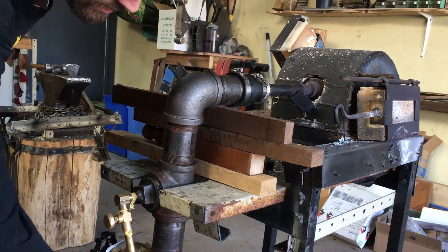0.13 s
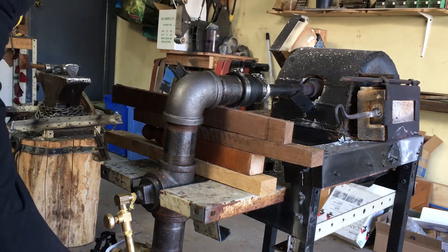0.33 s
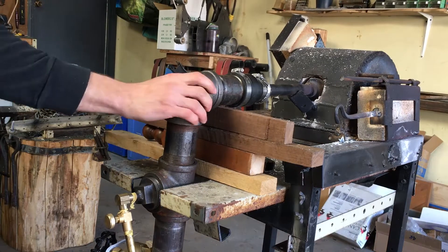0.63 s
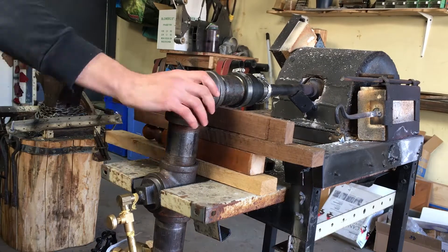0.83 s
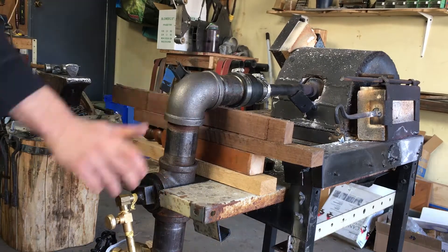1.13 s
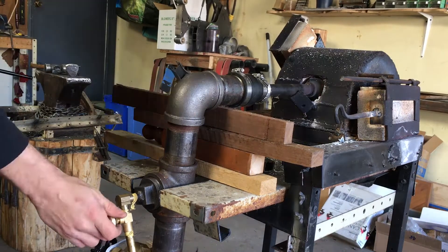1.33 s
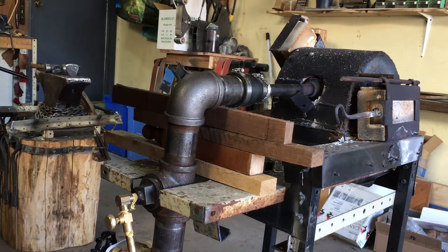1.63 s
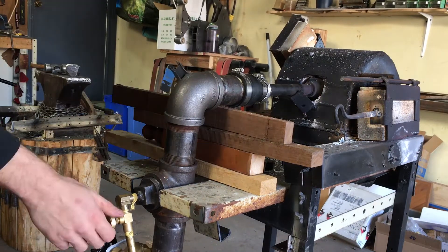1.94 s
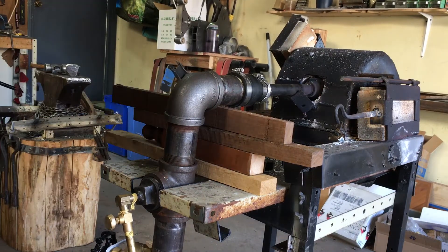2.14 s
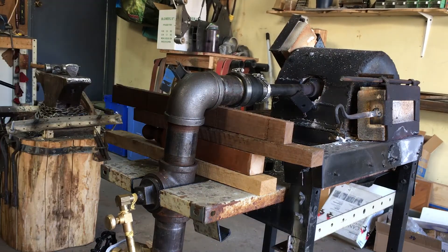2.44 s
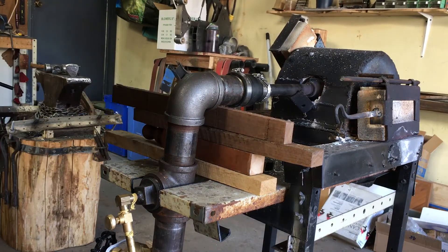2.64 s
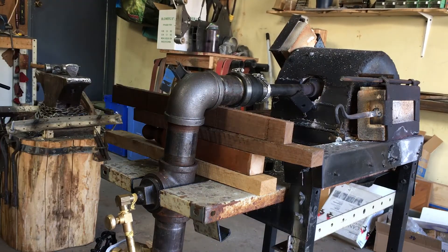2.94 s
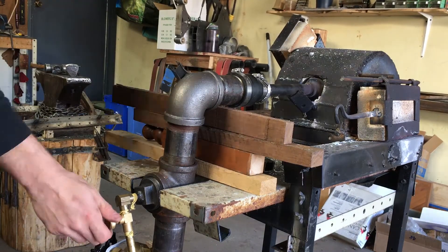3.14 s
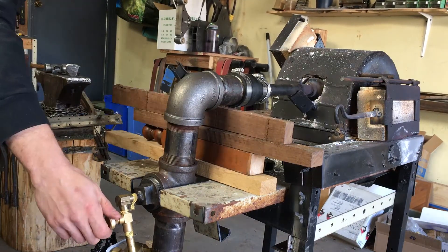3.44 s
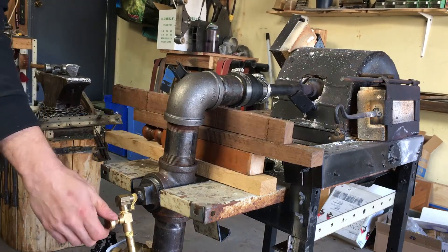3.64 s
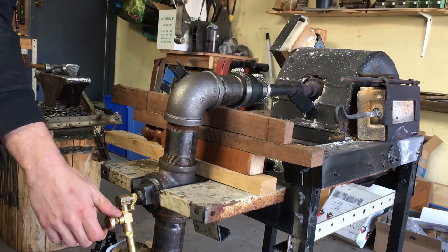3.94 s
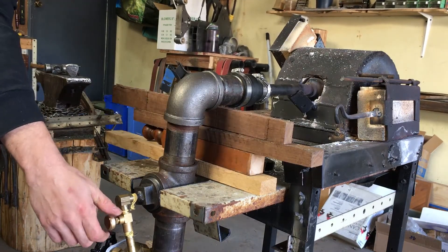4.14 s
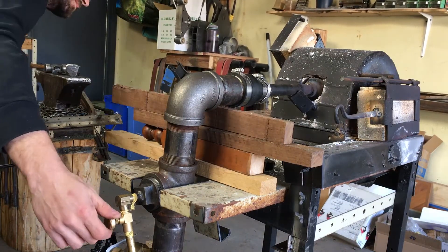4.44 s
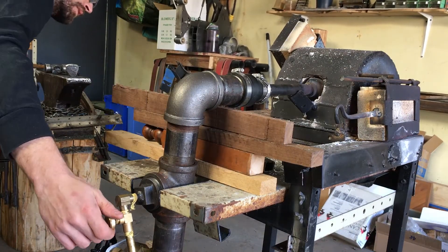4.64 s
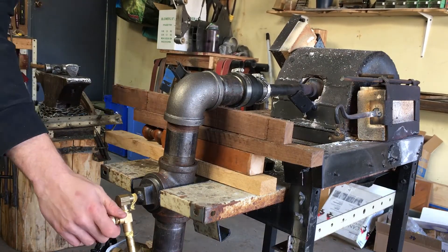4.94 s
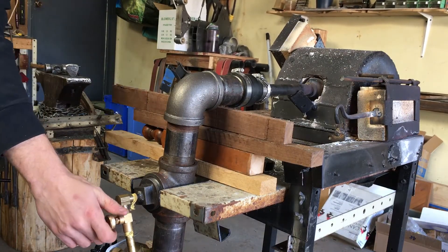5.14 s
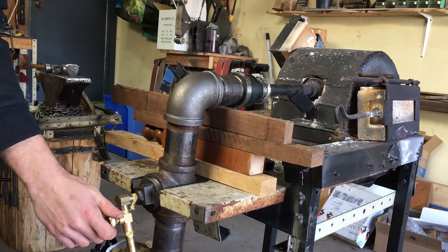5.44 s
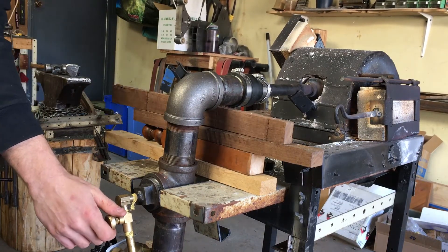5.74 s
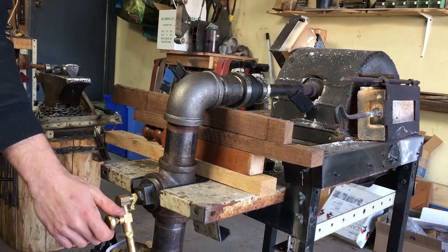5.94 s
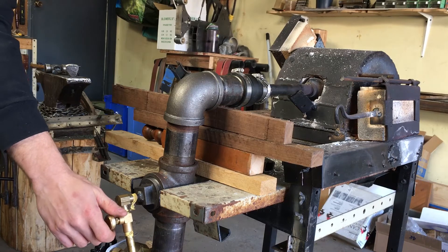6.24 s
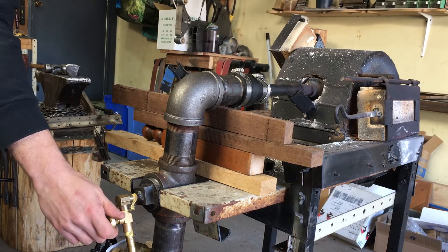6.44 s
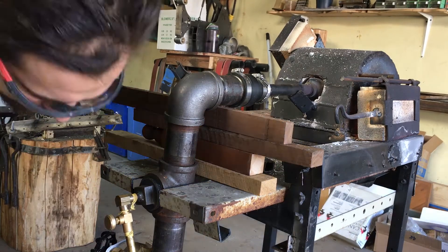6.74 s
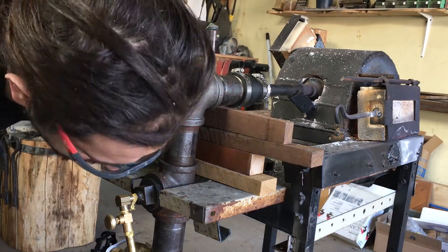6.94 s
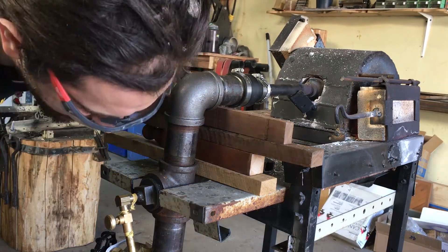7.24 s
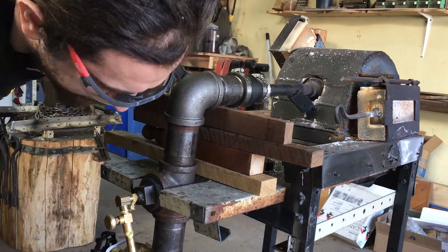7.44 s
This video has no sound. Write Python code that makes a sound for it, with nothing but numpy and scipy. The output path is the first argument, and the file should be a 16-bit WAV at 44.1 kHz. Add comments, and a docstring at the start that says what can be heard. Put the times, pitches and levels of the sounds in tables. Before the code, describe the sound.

A blower-fed gas forge burns with a steady, sputtering roar, hissing air and a thin, high motor whine.

```python
"""In a workshop, a propane forge burns while a hand trims the gas valve.
A fast electric blower feeds it: air hisses in the pipe, and the motor gives a thin whine
that flickers as the smith moves about. The flame roars and spits, ringing the burner pipe
and the chamber. It rumbles deeper near 2 s, sinks around 4.5 s and recovers."""
import sys
import numpy as np
from scipy.fft import rfft, irfft, next_fast_len
from scipy.io import wavfile
from scipy.ndimage import map_coordinates

SR = 44100
rng = np.random.default_rng(int(sys.argv[2]) if len(sys.argv) > 2 else 0)


def master_out(mix):
    """Clip the mix to full scale and print it as 16-bit PCM to the path in sys.argv[1]."""
    frames = np.transpose(np.atleast_2d(mix))
    ceiling = np.clip(frames, -1, 1)
    pcm = np.round(ceiling * 32767).astype(np.int16)
    wavfile.write(sys.argv[1], SR, pcm)


N = 334719


def amp(db):
    """Turn decibels into a gain."""
    return 10 ** (np.asarray(db) / 20)


def unit(x):
    """Scale x to an average power of 1."""
    return x / np.sqrt(np.mean(x ** 2) + 1e-20)


def along(points, hz):
    """Read between (Hz, value) points on a musical pitch scale."""
    freqs, values = np.transpose(points)
    return np.interp(np.log(hz + 1), np.log(freqs + 1), values)


def curves(rows):
    """Join timed points with straight lines, one curve per column after the time."""
    times, *columns = np.transpose(rows)
    return [np.interp(np.arange(N) / SR, times, column) for column in columns]


def bell(offset, width):
    """A smooth hill of height 1, its width taken halfway up."""
    return np.exp2(-(2 * offset / width) ** 2)


def bumps(rows):
    """Add up hills (middle, length, heights), one curve per height column."""
    t = np.arange(N) / SR
    return sum(np.outer(heights, bell(t - middle, length)) for middle, length, *heights in rows)


def wobble(rate):
    """A smooth curve through `rate` random values a second."""
    return map_coordinates(rng.standard_normal(int(N * rate / SR) + 4), [np.arange(N) * rate / SR])


def filtered(x, response):
    """Scale each frequency in x by response(hz)."""
    size = next_fast_len(N + 8192)
    return irfft(rfft(x, size) * response(np.fft.rfftfreq(size, 1 / SR)), size)[:N]


def resonant(x, spectrum, modes):
    """Give x a tone colour and boost it where a hollow space rings; power 1."""
    grid = np.linspace(0, SR / 2, 8192)
    boost_db = sum(db * bell(grid - hz, width) for hz, width, db in modes)
    return unit(filtered(x, lambda hz: amp(along(spectrum, hz) + np.interp(hz, grid, boost_db))))


def turbulence(flutter_db, rate):
    """White noise that flutters as swirls of gas pass."""
    return rng.standard_normal(N) * amp(flutter_db * wobble(rate))


def whistle(centre_hz, width_hz, db, flutter_db):
    """The draught catches one note of the pipe in faint, breathy surges."""
    tone = unit(filtered(rng.standard_normal(N), lambda hz: bell(hz - centre_hz, width_hz)))
    return amp(db) * unit(tone * amp(flutter_db * wobble(11)))


# Tone colours of the hiss and the fizz above it. Each row: frequency in Hz, relative level in dB.
HISS_COLOUR = [(2500, -32), (3800, 0), (4400, -1.5), (5200, 2), (6000, 1.5), (6900, 0.5), (8000, -4),
               (9100, -6.5), (9900, -8), (13000, -26)]
FIZZ_COLOUR = [(6000, -20), (9900, -4), (10700, 3), (13100, 3.5), (13500, -1), (14200, 1), (15800, -.5)]
# Where the air pipe rings. Each row: frequency in Hz, width in Hz, boost in dB.
PIPE_RINGS = [(4180, 102, 15.5), (4530, 55, 15.5), (4680, 41, 8), (4880, 140, 8.5), (5060, 22, 11.5),
              (5380, 45, 8.5), (5846, 63, 8.5), (6000, 120, 6.5), (6410, 58, 6), (6790, 57, 8),
              (7110, 200, 3), (7420, 67, 6.5), (8020, 110, 5.5), (8650, 120, 6.5), (9130, 67, 10.5)]
# The hiss dips or lifts a little. Each row: middle and length in seconds, change in dB.
HISS_BUMPS = [(1.95, 0.7, -1.5), (7.25, 0.77, 0.5)]


def air():
    """Blown air hisses in the pipe; the fine fizz on top rises as the flame sinks."""
    change_db = flame_change()
    shift_db, = bumps(HISS_BUMPS)
    hiss_db = -42.3 + 0.043 * change_db + shift_db
    fizz_db = -49.6 - 0.5 * change_db
    hiss = resonant(turbulence(flutter_db=0.45, rate=36), HISS_COLOUR, PIPE_RINGS)
    fizz = unit(filtered(rng.standard_normal(N), lambda hz: amp(along(FIZZ_COLOUR, hz))))
    return amp(hiss_db) * hiss + amp(fizz_db) * fizz


# The whine follows the motor's speed. Each row: time in seconds, pitch in Hz.
WHINE_PITCH = [(0, 12219), (1.5, 12230), (2.55, 12258), (3.35, 12232), (3.75, 12250), (4.45, 12240),
               (4.85, 12254), (5.4, 12237), (5.8, 12241), (7.59, 12226)]
# The whine's slow rise and fall. Each row: time in seconds, level in dB.
WHINE_LEVEL = [(0, -42), (0.7, -39.5), (1.35, -36.5), (2.0, -38.5), (2.2, -42), (3.0, -41), (3.15, -37),
               (4.3, -36), (5.8, -40), (6.2, -35.5), (6.75, -33.5), (7.2, -40.5), (7.59, -36.5)]
# Brief flares and dips. Each row: middle and length in seconds, dB change of whine and of lower tone.
TONE_FLARES = [(0.22, 0.07, 5, 7.3), (0.49, 0.07, -6.5, 11), (1.28, 0.07, 3.2, 4.8),
               (3.12, 0.17, 4.7, -1.2), (3.27, 0.05, -5.5, 0.6), (4.48, 0.07, 2.0, 0)]
# The smith moves near the blower. Each row: middle and length in seconds, whine flicker in dB.
SMITH_MOVES = [(.2, .55, 3), (1.0, .7, 1.7), (6.85, .5, 1.3)]
# Faint motor tones. Each row: cycles per shaft turn, dB against the average whine, share of its changes.
FAINT_TONES = [(18, -20.5, .1), (30, -23.5, .6), (34, -30, .3), (36, -29, .3), (41, -24, 0.99)]


def motor(whine_cycles=35, lower_cycles=29, flicker_rate=22):
    """One slightly unsteady shaft drives all the blower's tones, each a whole number of cycles a turn."""
    pitch_hz, = curves(WHINE_PITCH)
    level_db, = curves(WHINE_LEVEL)
    flare_db, lower_flare_db = bumps(TONE_FLARES)
    flicker_db, = bumps(SMITH_MOVES)
    average_db = np.mean(level_db)
    change_db = level_db - average_db
    shaft_angle = 2 * np.pi * np.cumsum(pitch_hz + 2.5 * wobble(30)) / (whine_cycles * SR)
    whine_db = level_db + flare_db + flicker_db * wobble(flicker_rate) + 0.88 * wobble(70)
    whine = amp(whine_db) * np.sin(whine_cycles * shaft_angle)
    lower_db = -57 + 0.25 * change_db + lower_flare_db + 0.96 * wobble(25)
    lower_db += 1.8 * flicker_db * wobble(flicker_rate)
    lower = amp(lower_db) * np.sin(lower_cycles * shaft_angle)
    faint = sum(amp(average_db + db + share * change_db + 1.4 * wobble(18)) * np.sin(cycles * shaft_angle)
                for cycles, db, share in FAINT_TONES)
    return np.sqrt(2) * (whine + lower + faint)


# Tone colour of burning gas. Each row: frequency in Hz, relative level in dB.
ROAR_COLOUR = [(150, -67), (400, -24), (700, -10), (1100, -6), (1700, -.5), (2100, 1), (2400, -8.5),
               (3300, -12), (4400, -13), (5500, -32), (8000, -58)]
# Where the chamber and burner pipe ring. Each row: frequency in Hz, width in Hz, boost in dB.
FORGE_RINGS = [(318, 34, 8), (365, 67, 9), (504, 81, 12), (570, 48, 7), (752, 62, 7), (827, 54, 5),
               (941, 74, 10), (1092, 63, 11), (1153, 53, 11), (1243, 52, 11), (1320, 28, 7), (1396, 68, 9),
               (1501, 32, 9), (1539, 47, 8), (1660, 81, 9), (1792, 62, 8), (1858, 47, 6), (2197, 51, 8),
               (2271, 39, 6), (2441, 42, 8), (2544, 81, 10), (2774, 148, 9), (2947, 230, 12), (3098, 41, 8),
               (3182, 67, 16), (3422, 96, 14), (3667, 143, 12), (3910, 102, 12), (4036, 62, 11),
               (4198, 147, 17)]


def ring_forge(noise):
    """The noise of burning gas rings the chamber and burner pipe."""
    return resonant(noise, ROAR_COLOUR, FORGE_RINGS)


# The flame spits. Each row: start in seconds, relative strength in dB.
GAS_PUFFS = [(1.857, -12), (1.913, -18), (1.958, -9), (1.969, -13), (2.055, -14), (2.253, -16),
             (3.837, -21), (3.855, -24)]


def spits(decay_s=0.0012):
    """Larger pockets of gas go off in short puffs that ring the forge."""
    t = np.arange(N) / SR
    puffs = sum(amp(db) * (t >= start) * np.exp(-np.abs(t - start) / decay_s) for start, db in GAS_PUFFS)
    bursts = puffs * rng.standard_normal(N)
    return amp(-8.0) * np.std(bursts) * ring_forge(bursts)


def sputter(rate, spread_db):
    """Small pockets of gas burn at random moments, in uneven sizes."""
    clicks = (rng.random(N) < rate / SR) * rng.choice([-1, 1], N)
    sizes = amp(spread_db * np.minimum(rng.standard_normal(N), 2))
    return unit(clicks * sizes)


# Tone colours of the rumble and the flutter under it. Each row: frequency in Hz, relative level in dB.
RUMBLE_COLOUR = [(100, -60), (152, -38), (182, -12), (280, -3.5), (450, -0.5), (700, 0), (1100, -8.5),
                 (2500, -61)]
DEEP_COLOUR = [(25, -2), (60, 0), (140, 5), (300, -13), (1000, -50)]
# The flame swells in the chamber. Each row: middle and length in seconds, rumble boost in dB.
RUMBLE_SWELLS = [(1.97, 0.69, 5.5), (4.42, 0.53, 6)]
# The roar as the gas valve is trimmed. Each row: time in seconds, level in dB.
ROAR_LEVEL = [(0, -28), (2.98, -29), (3.95, -31.5), (4.54, -32), (5.6, -29.5), (6.85, -29.5), (7.59, -29)]


def flame():
    """Swirling gas burns with a sputtering roar, over a heaving rumble that grows with it."""
    roar_db, = curves(ROAR_LEVEL)
    swell_db, = bumps(RUMBLE_SWELLS)
    rumble_db = -42.5 + 2.04 * flame_change() + swell_db
    pops = sputter(rate=420, spread_db=6.0)
    roar = ring_forge(turbulence(flutter_db=0.42, rate=60) + 0.4 * pops)
    rumble = resonant(turbulence(flutter_db=1, rate=22) + 0.47 * pops, RUMBLE_COLOUR, FORGE_RINGS)
    deep = unit(filtered(turbulence(flutter_db=1.5, rate=12), lambda hz: amp(along(DEEP_COLOUR, hz))))
    return amp(roar_db) * roar + amp(rumble_db) * (rumble + amp(-46) * deep)


def flame_change():
    """How far the flame is above its usual strength, in dB."""
    roar_db, = curves(ROAR_LEVEL)
    return roar_db - np.median(roar_db)


def scene():
    """Forge and blower, heard alike in both ears."""
    sound = flame() + spits() + air()
    sound += whistle(centre_hz=4234, width_hz=110, db=-52.0, flutter_db=1.0) + motor()
    return np.array([sound, sound])


def record(dry):
    """Cut away the very highest treble."""
    top_hz = 15760
    return np.array([filtered(channel, lambda hz: hz < top_hz) for channel in dry])


dry = scene()
out = record(dry)
master_out(out)
```